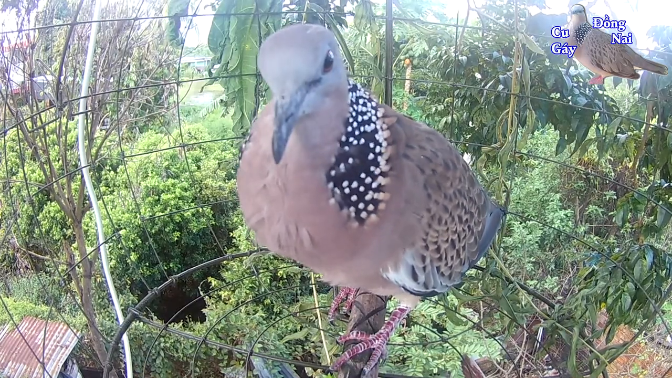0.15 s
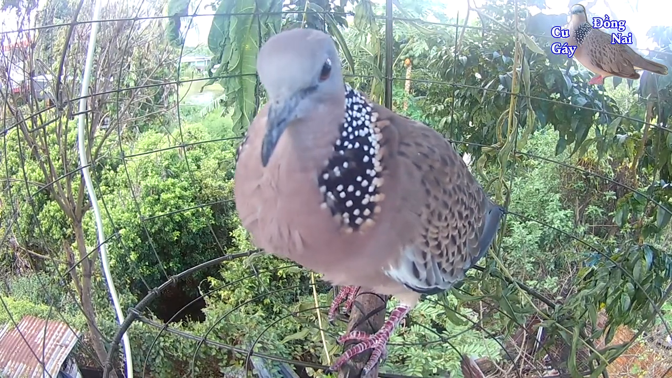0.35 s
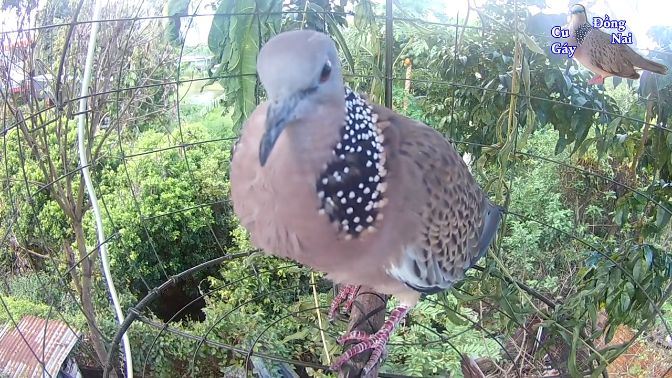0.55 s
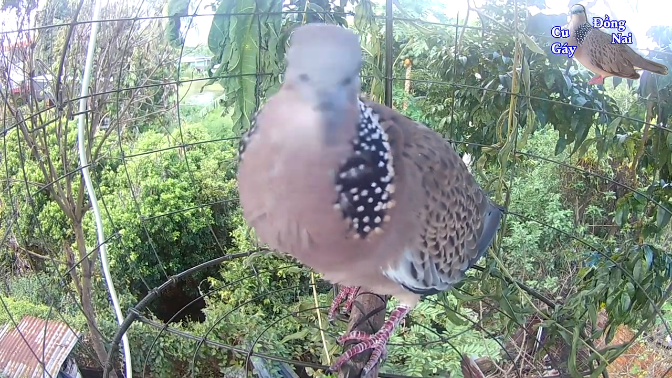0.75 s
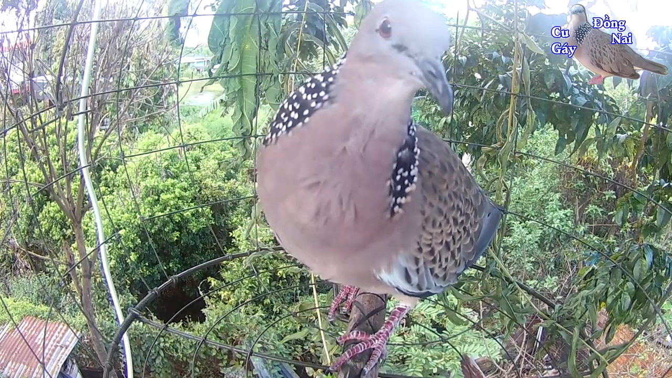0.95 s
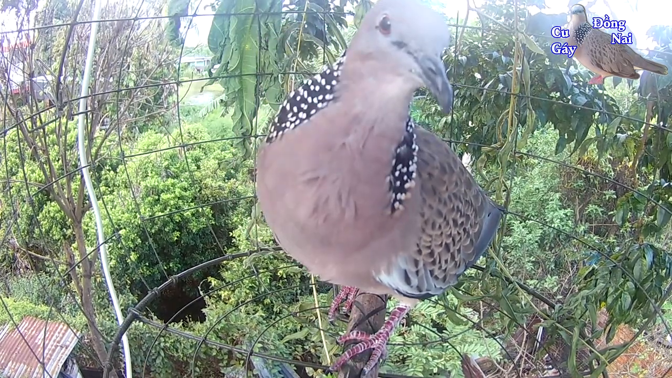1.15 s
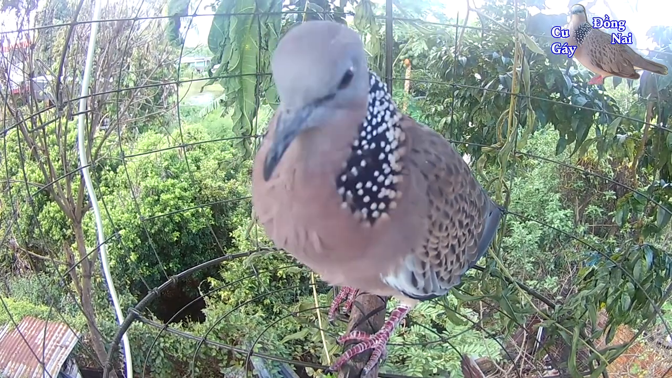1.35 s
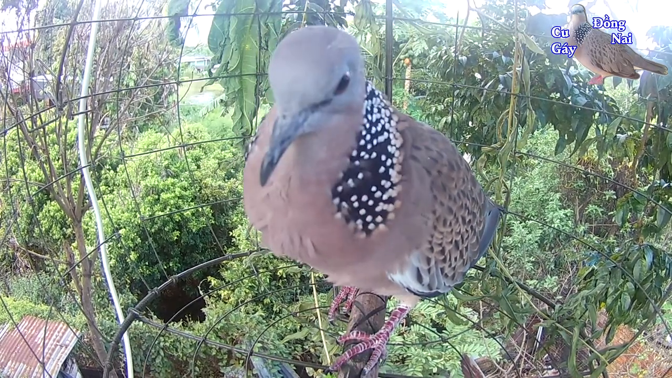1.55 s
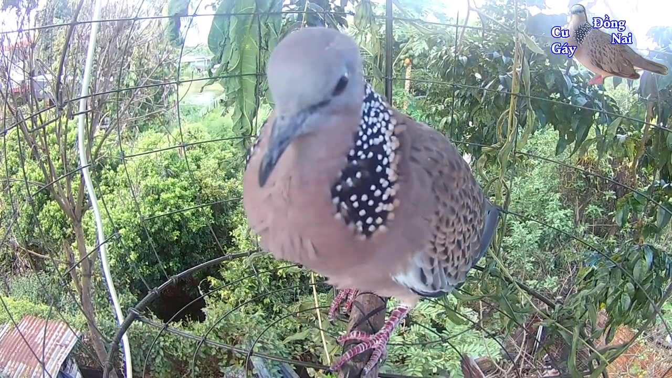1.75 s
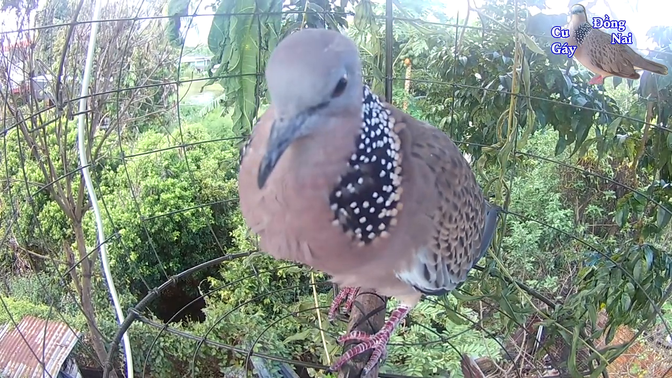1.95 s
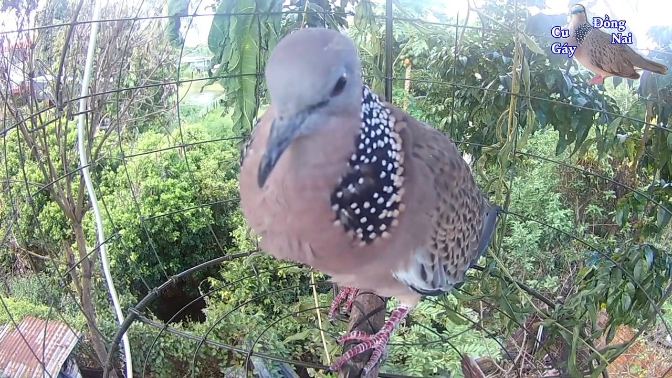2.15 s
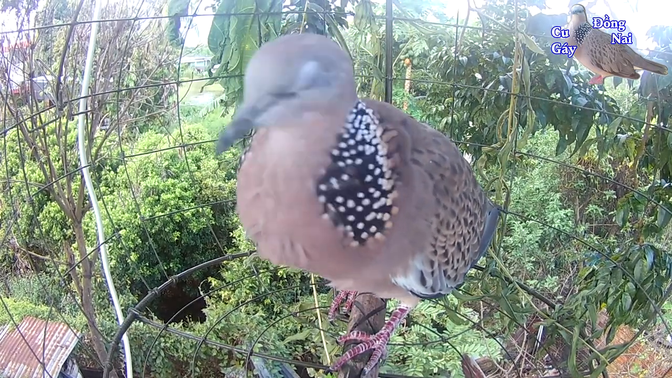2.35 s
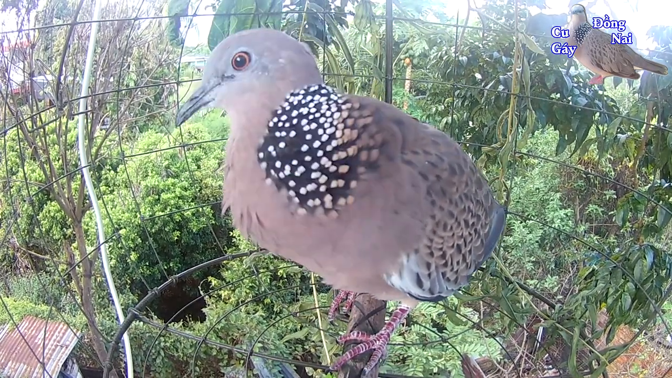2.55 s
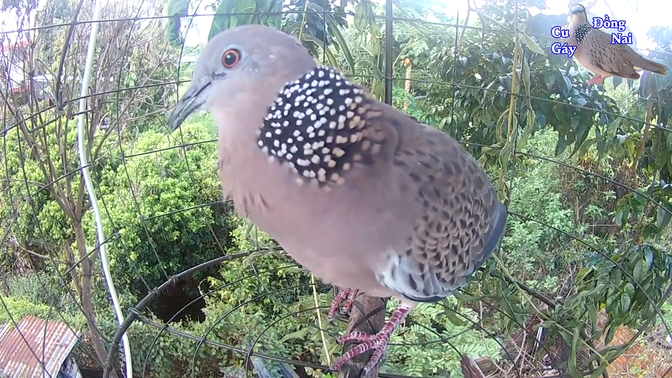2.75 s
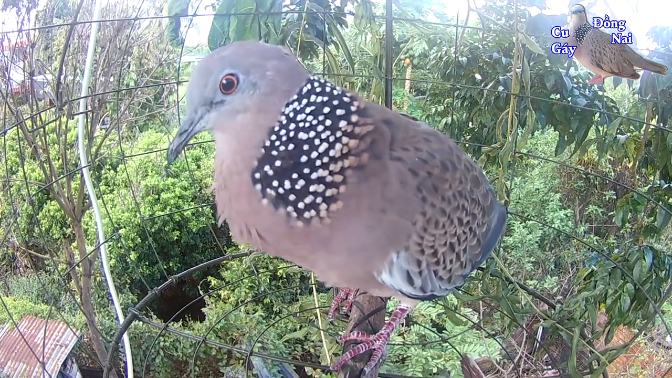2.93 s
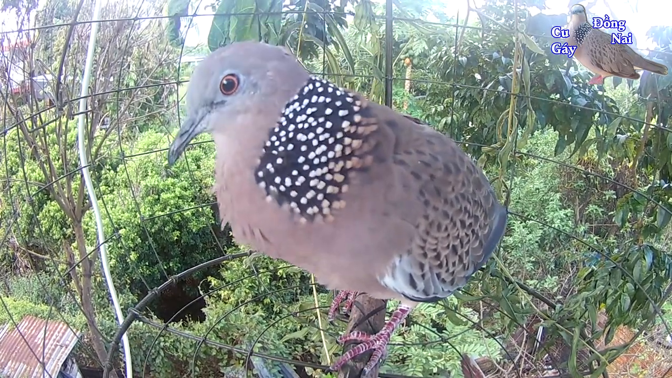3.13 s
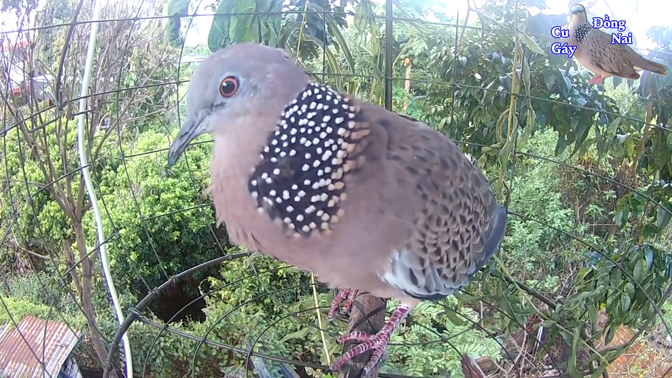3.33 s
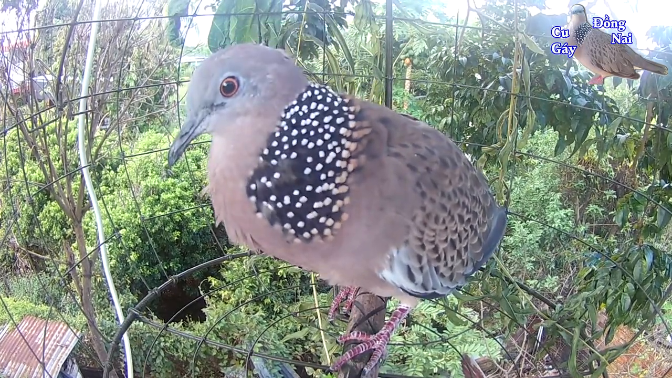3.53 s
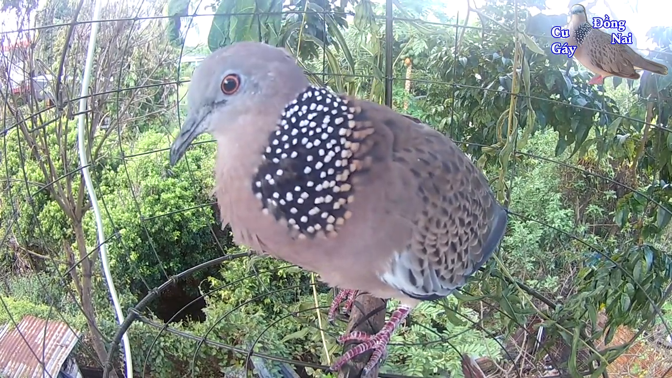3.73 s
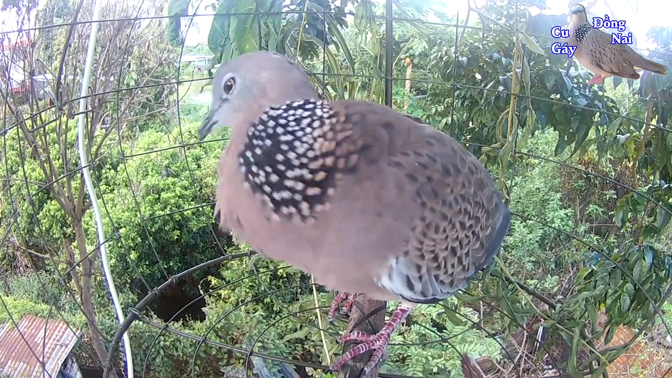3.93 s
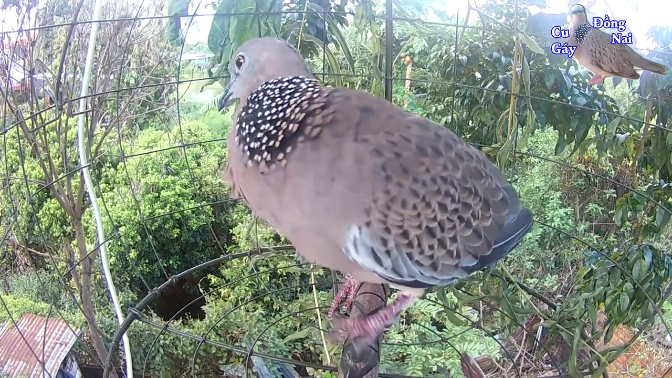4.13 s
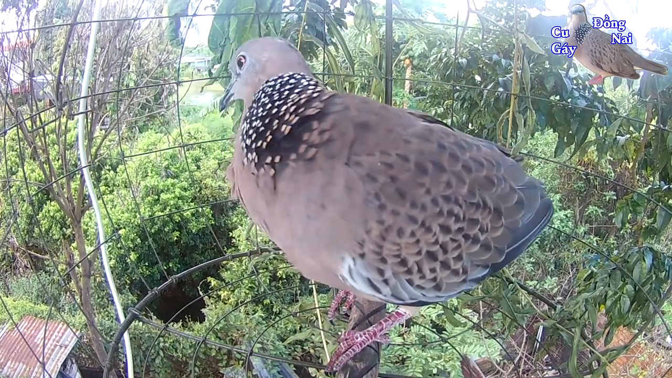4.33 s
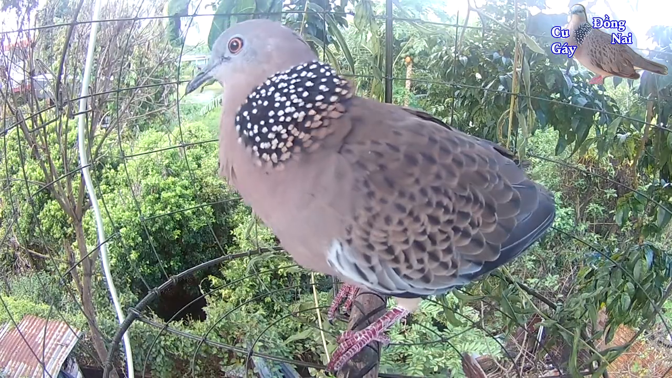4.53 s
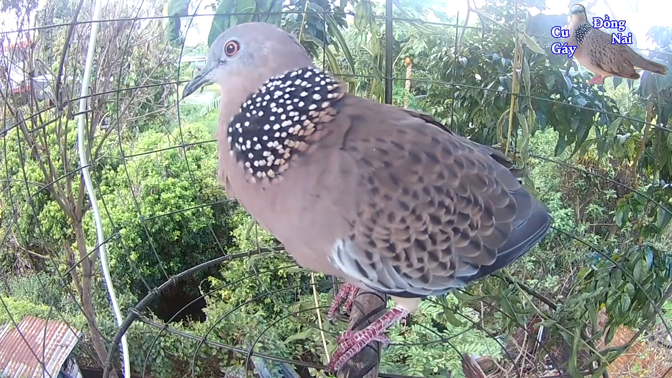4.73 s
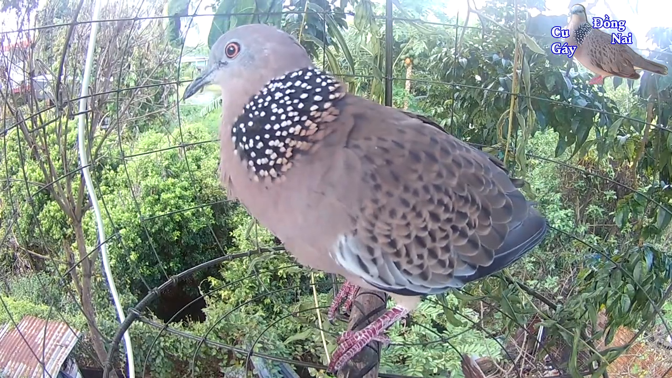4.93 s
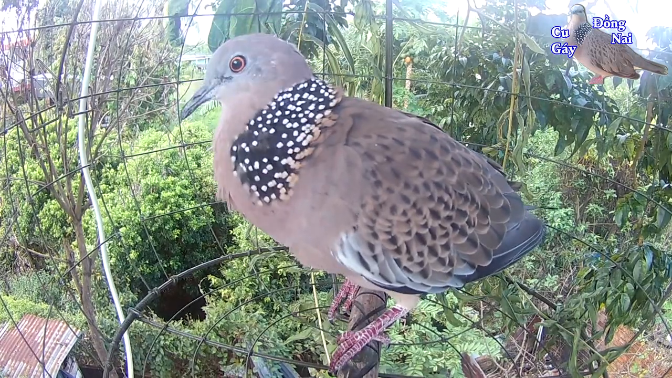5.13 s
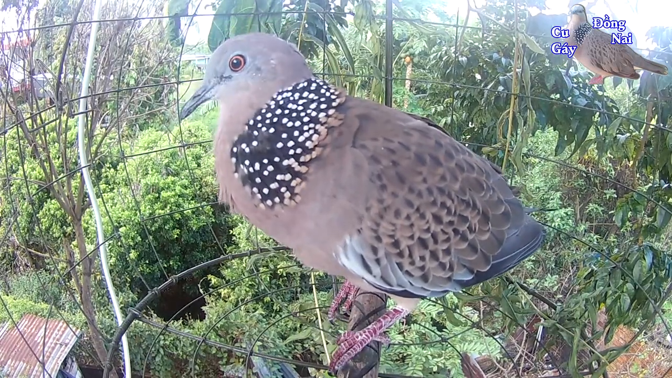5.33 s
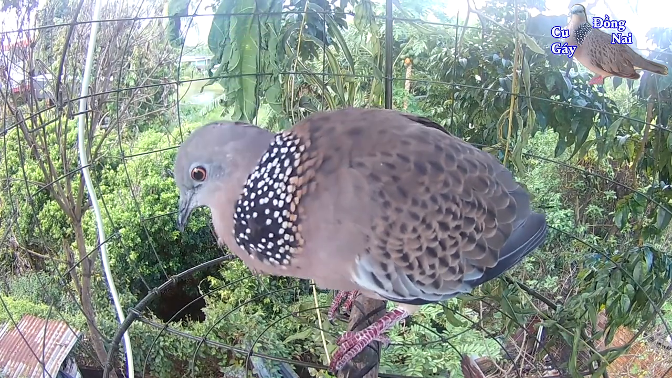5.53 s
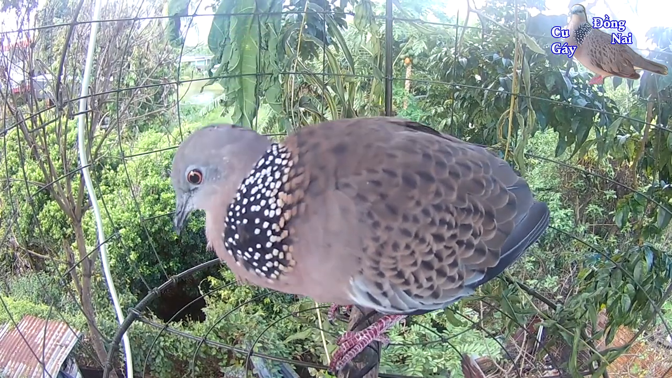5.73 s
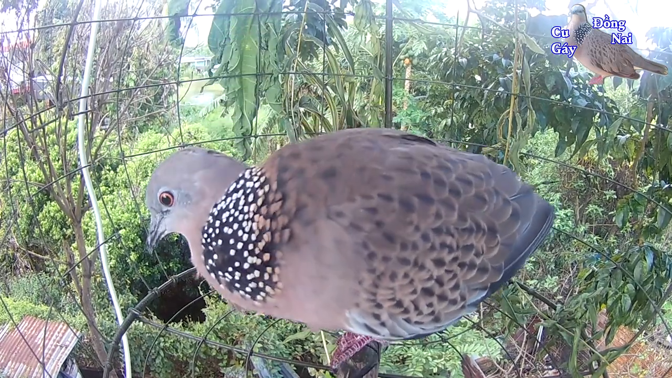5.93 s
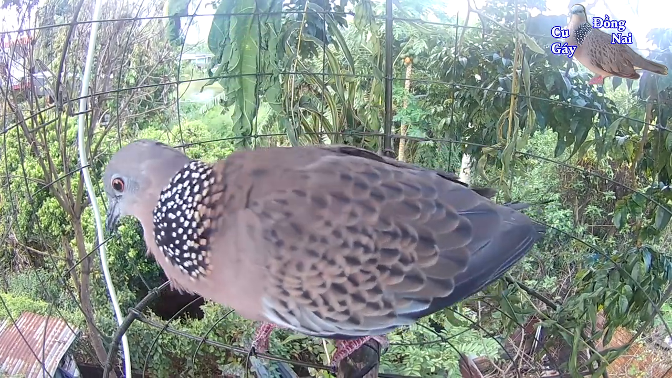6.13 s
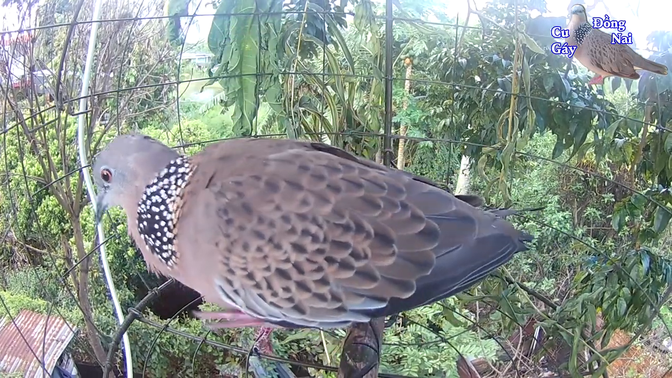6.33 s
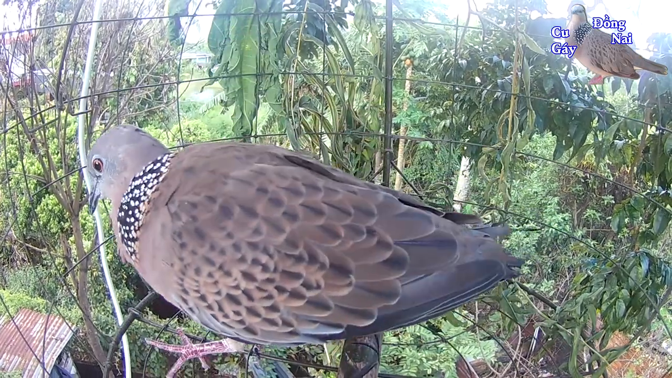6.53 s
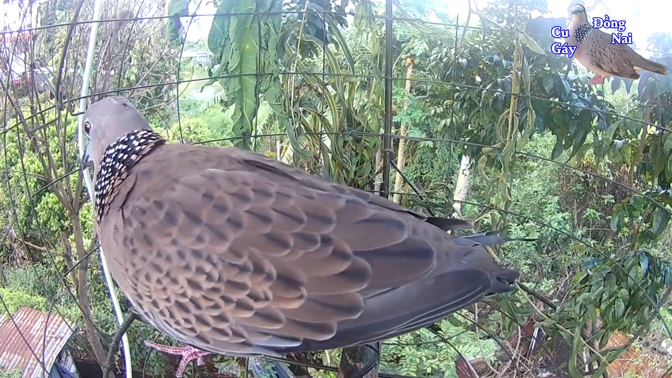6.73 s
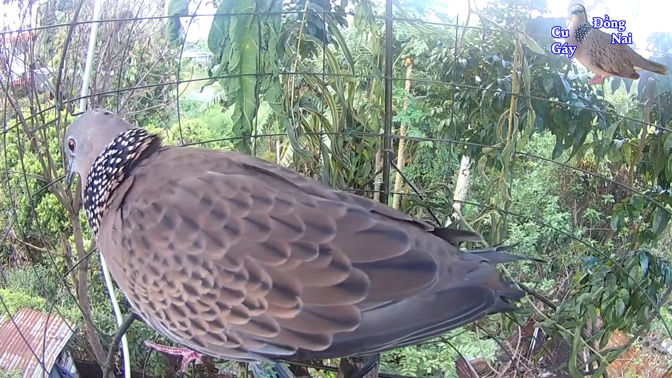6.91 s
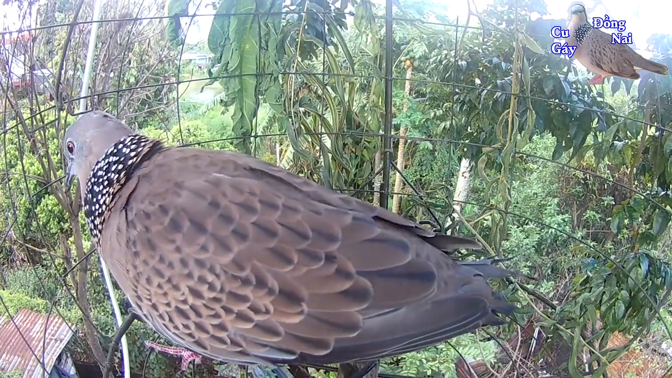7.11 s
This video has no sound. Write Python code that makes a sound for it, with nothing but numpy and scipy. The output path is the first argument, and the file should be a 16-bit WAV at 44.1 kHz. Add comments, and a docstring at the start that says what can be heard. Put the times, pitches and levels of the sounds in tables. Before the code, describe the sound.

A dove coos loudly up close in repeated trilled, falling phrases over a quiet garden hush, with faint distant birds.

```python
"""A spotted dove coos close by in a garden: two short notes, then a long falling one, over and over.
It sings with its beak shut, through a swollen crop (a throat pouch); a fluttering valve chops the
nearly pure tone into a trill. A distant rooster crows and other doves answer over a quiet hush.
The near bird shifts about, so its feet knock and scratch on the perch."""
import sys
import numpy as np
from scipy import signal
from scipy.fft import rfft, irfft
from scipy.io import wavfile

SR = 44100
rng = np.random.default_rng(int(sys.argv[2]) if len(sys.argv) > 2 else 0)


def unload_audio(sound):
    """Save the sound as a 16-bit wav file, at the path given as the first command line argument."""
    columns = np.transpose(np.atleast_2d(sound))
    # keep every value between -1 and 1, then stretch to whole-number steps
    steps = np.round(np.clip(columns, -1, 1) * 32767)
    wavfile.write(sys.argv[1], SR, steps.astype(np.int16))


N = 316197
TIME = np.arange(N) / SR
REST_HZ, EFFORT_DB_PER_OCTAVE = 411, 27   # short notes: pitch with no effort; louder as they get higher


def from_db(db):
    """Turn decibels into a factor to multiply by."""
    return 10 ** (np.asarray(db) / 20)


def unit_power(x):
    """Scale a sound to an average power of 1."""
    return x / np.sqrt(np.mean(x ** 2) + 1e-20)


def gain_at(points, hz):
    """Read the gain at hz from a curve with rows of f/Hz, level/dB."""
    f, db = np.transpose(points)
    return from_db(np.interp(np.log(hz + 1e-3), np.log(f), db))


def band(x, hz, kind, order=2):
    """Keep the lows, the highs or a band; a higher order cuts more steeply."""
    return signal.sosfilt(signal.butter(order, np.clip(hz, 10, .45 * SR), kind, fs=SR, output="sos"), x)


def drift(rate_hz, size=N):
    """A smooth random wobble of about 1 either way, mostly slower than rate_hz."""
    return unit_power(band(rng.standard_normal(size + SR // 2), rate_hz, "low")[SR // 2:])


def coloured_noise(spectrum):
    """Noise of power 1, shaped by rows of f/Hz, level/dB."""
    hz = np.arange(N // 2 + 1) * SR / N
    return unit_power(irfft(rfft(rng.standard_normal(N)) * gain_at(spectrum, hz), N))


def ramp(t, length):
    """Rise from 0 to 1 over length, then stay there."""
    return np.clip(t / length, 0, 1)


def clock(length):
    """Seconds since the start of a note."""
    return TIME[:int(length * SR)]


def placed(start, x):
    """Set a short sound at its time in the scene."""
    return np.interp(TIME, start + np.arange(len(x)) / SR, x, left=0, right=0)


def trill(turns, depth, gap=.62, chirp=.072, sag=.19, leak=.092, rounding=.11):
    """A valve nearly shuts once a turn: the tone chokes and sags, then climbs through the next pulse."""
    closure = np.round(turns - np.floor(turns.min())).astype(int)
    luck = rng.random((closure.max() + 1, 2))[closure]
    depth = np.clip(depth, 0, 1)
    # as the trill weakens, closures get shorter and some fail
    strength = np.clip(2.6 * depth - .6 - luck[:, 0], 0, 1)
    width = gap * (1 + depth) / 2
    shut = strength * np.exp(-np.abs(np.sin(np.pi * turns) / width) ** 4)
    gain = (1 - (1 - leak) * shut) / np.sqrt(1 - .4 * depth)
    gain *= 1 - rounding * depth * np.cos(2 * np.pi * turns)   # each pulse swells to its middle
    # each closure drags the pitch down by a different amount, which makes the purr rough
    bend = 1 - chirp * depth * np.sin(2 * np.pi * turns) - 2 * sag * luck[:, 1] * shut
    return gain, bend


def coo(pitch, level_db, depth, closure_s, trill_hz, speed_up=0, jitter=.014, breath_db=-44):
    """One dove note: a nearly pure tone chopped by the trill; its octave comes out as the pitch sinks."""
    # what the swollen crop lets out of the octave: f/Hz, level/dB against the main tone
    overtones = [(740, 4.5), (820, 4), (900, -4), (1000, -14.5), (1100, -21.5), (1200, -33.5),
                 (1290, -42.5), (1500, -38)]
    t = TIME[:len(pitch)]
    turns = np.cumsum(np.clip(trill_hz + speed_up * (t - closure_s), 40, 80)) / SR
    turns += .05 * drift(25, len(t)) - np.interp(closure_s, t, turns)   # a closure falls near closure_s
    gain, bend = trill(turns, depth)
    hz = pitch * bend * (1 + jitter * drift(150, len(t)))
    phase = 2 * np.pi * np.cumsum(hz) / SR
    octave = gain_at(overtones, 2 * hz)
    tone = np.sin(phase) + octave * np.sin(2 * phase) + from_db(-42.5) * np.sin(3 * phase)
    tone /= np.hypot(1, octave)
    breath = unit_power(band(rng.standard_normal(len(t)), [350, 1150], "band"))
    fade = ramp(np.minimum(t, t[-1] - t), .0013)
    return from_db(level_db) * fade * (np.sqrt(2) * gain * tone + from_db(breath_db) * breath)


def arched_note(start, length, top_hz, db, attack_s=.011, attack_db=14):
    """Pitch and loudness rise and fall together, then trail off in a low purr."""
    purr_s, purr_fade_db_per_s = .058, 197
    t = clock(length + purr_s)
    arch = np.abs(np.sin(np.pi * ramp(t, length))) ** .83
    pitch = REST_HZ + (top_hz - REST_HZ) * arch
    level_db = db + EFFORT_DB_PER_OCTAVE * np.log2(pitch / top_hz)
    level_db -= attack_db * (1 - ramp(t, attack_s))
    level_db -= purr_fade_db_per_s * np.maximum(t - length, 0)
    depth = ramp(t - .85 * length, .025)
    return placed(start, coo(pitch, level_db, depth, closure_s=length, trill_hz=64))


def rolled_note(start, climb_s, top_hz, db, clear_s):
    """A fast trill climbs, clears with a last push to the top and drops away."""
    start_hz, push_hz, push_s = 439, 45, .026
    attack_s, attack_db, drop_s, release_db = .042, 20, .033, 8.5
    t, closure_s = clock(climb_s + drop_s), climb_s - clear_s
    climbing = start_hz + (top_hz - push_hz - start_hz) * ramp(t, climb_s) ** .6
    climbing += push_hz * (1 - ramp(climb_s - t, push_s) ** 2)
    drop = ramp(t - climb_s, drop_s)
    pitch = REST_HZ + (climbing - REST_HZ) * np.cos(np.pi / 2 * drop) ** 1.6
    level_db = db + EFFORT_DB_PER_OCTAVE * np.log2(pitch / top_hz)
    level_db -= attack_db * (1 - ramp(t, attack_s)) + release_db * drop ** 3
    depth = .79 * (1 - ramp(t - closure_s, .02) ** 2)
    return placed(start, coo(pitch, level_db, depth, closure_s, trill_hz=80))


def falling_note(start, length, top_hz, db, surge_db):
    """The voice catches on one low, soft pulse, leaps up, sinks in a long fading trill and drops."""
    start_hz, sunk_hz, end_hz = 554, 495.9, 332.4
    attack_s, catch_s, top_at_s, drop_s = .016, .028, .046, .038
    attack_db, catch_db, fade_db, release_db = 23.5, 11.5, 15, 32.5
    t = clock(length)
    leap = np.sin(np.pi / 2 * ramp(t - catch_s, top_at_s - catch_s))
    sink = ramp(t - top_at_s, length - top_at_s - drop_s)
    drop = ramp(t - length + drop_s, drop_s)
    waver = drift(65, len(t))   # the effort is never quite steady
    surge = np.exp(-((t - .058) / .008) ** 2)   # an extra push on one pulse at the top
    pitch = start_hz + (top_hz - start_hz) * leap
    pitch -= (top_hz - sunk_hz) * sink ** 1.1 + (sunk_hz - end_hz) * drop ** .89
    pitch *= 1 + .02 * waver
    level_db = db - attack_db * (1 - ramp(t, attack_s)) - catch_db * (1 - leap) ** 2
    level_db -= fade_db * sink ** 1.906 + release_db * drop ** 3
    level_db += .2863 * waver + surge_db * surge
    depth = .79 * (1 - sink ** 3.1) + .74 * drop   # the trill thins out, then creaks in the drop
    return placed(start, coo(pitch, level_db, depth, closure_s=catch_s, trill_hz=50, speed_up=85))


def near_dove(crop_db=-2):
    """The crop rings near 1.1 kHz and passes little above; the small body gives out nothing deep."""
    # the pure note that opens a call: t/s, length/s, top pitch/Hz, level/dB
    arches = [(-.125, .085, 610, -8), (1.325, 0.0833, 606, -10), (2.822, 0.08, 604, -11),
              (4.551, 0.075, 586, -14), (6.875, 0.077, 622, -14)]
    # the rolled second note: t/s, climb/s, top pitch/Hz, level/dB, clear end of the climb/s
    rolls = [(.012, .13, 669, -6.5, 0.026), (1.47, 0.11, 690, -5, 0.038), (2.97, 0.12, 695.2, -6.5, 0.035),
             (4.698, 0.11, 642.3, -11.5, .02), (7.035, .111, 746, -6.5, 0.038)]
    # the long last note: t/s, length/s, top pitch/Hz, level/dB, surge/dB
    falls = [(0.282, 0.4125, 719.7, -5.5, 0.85), (1.71, 0.4286, 736, -5.5, 2.5),
             (3.213, 0.426, 724, -6.5, 0), (4.937, .418, 728, -8.5, -0.5)]
    voice = sum(arched_note(*row) for row in arches)
    voice += sum(rolled_note(*row) for row in rolls)
    voice += sum(falling_note(*row) for row in falls)
    voice += from_db(crop_db) * band(voice, [1020, 1220], "band")
    return band(band(voice, 400, "high", order=6), 1260, "low", order=6)


def rooster(jitter=.0064, rasp_jitter=.031, hoarse_db=-5, throb_db=2, attack_s=.04, release_s=.018):
    """A throbbing crow; rasp adds tones between the overtones, a shaky pitch and hoarse noise."""
    # the rooster's throat as heard from afar: f/Hz, level/dB
    throat = [(350, -40), (720, 2), (1000, -12), (1400, 4), (1700, -11.5), (1900, -17), (2150, -31.5),
              (2850, -40), (3050, -37.5), (3500, -52.5)]
    # syllables of the crows: t/s, length/s, first pitch/Hz, last pitch/Hz, level/dB, rasp/0-1
    syllables = [(-.03, 0.34, 684.2, 664.4, -45.5, 0.2), (0.211, 0.15, 776, 741, -41, 0.59),
                 (0.328, 0.33, 731, 726, -48, 0.37), (0.959, 0.15, 686.7, 639.5, -50.5, 0.25),
                 (6.589, 0.081, 714, 766.9, -38, 0.25), (6.653, .12, 729, 702, -36, 0.26),
                 (6.861, .125, 828, 843.5, -29.5, 0.1), (6.94, 0.116, 771, 771, -43.5, 0.99),
                 (7.03, 0.14, 777, 780, -34.5, .9)]
    out, noise = np.zeros(N), coloured_noise(throat)
    for start, length, first_hz, last_hz, db, rasp in syllables:
        t = clock(length)
        scoop = 1 - .09 * np.exp(-t / .015)   # each syllable slides up from below its first pitch
        pitch = (first_hz + (last_hz - first_hz) * t / length) * scoop
        shake = (jitter + rasp_jitter * rasp ** 2) * drift(120, len(t))
        phase = 2 * np.pi * np.cumsum(pitch * (1 + shake)) / SR
        voice = sum(gain_at(throat, pitch * multiple) * weight * np.sin(phase * multiple)
                    for multiple, weight in [(1, 1), (1.5, rasp), (2, 1), (2.5, rasp), (4, 1)])
        envelope = from_db(db) * ramp(t, attack_s) * ramp(length - t, release_s)
        hoarse = from_db(hoarse_db) * np.sqrt(rasp) * placed(start, envelope) * noise
        out += placed(start, envelope * voice) + hoarse
    return from_db(throb_db * drift(45)) * out


def air(hush_db=-58.5, drone_hz=105, drone_db=-65):
    """A quiet outdoor hush with a low, wavering drone."""
    # the tone colour of garden air: f/Hz, relative level/dB
    hush_colour = [(25, -7.5), (122, -12.5), (250, -12.5), (500, -16.5), (800, -16.5), (1340, -16.5),
                   (2770, -36), (4500, -37), (7100, -48), (15500, -51.5)]
    drone = unit_power(band(rng.standard_normal(N), [drone_hz * .87, drone_hz * 1.15], "band"))
    return from_db(hush_db) * coloured_noise(hush_colour) + from_db(drone_db) * drone


def far_doves(attack_s=.0322, release_s=.047):
    """Trilled calls that sink and grow clearer at the end; their overtones are lost on the way."""
    # distant calls: t/s, length/s, first pitch/Hz, last pitch/Hz, level/dB, trill depth/0-1,
    # swell as the trill clears/dB
    calls = [(0.687, 0.48, 804, 653.5, -47.5, 0.99, 7), (2.192, 0.4, 686, 624.7, -43, 0.6, -2),
             (3.619, 0.14, 754.2, 703, -44.5, 0.74, -1.5), (3.871, .43, 744, 681.4, -48, 0.99, 8),
             (5.518, .2, 796.4, 766, -60, 0.43, 7.5), (5.729, 0.078, 708, 669, -51.5, 0.8, -5.5),
             (5.913, 0.13, 728, 658, -48.5, 0.39, 0), (6.123, .33, 742, 669.5, -49.5, .95, -5.5)]
    voices = np.zeros(N)
    for start, length, first_hz, last_hz, db, depth, swell_db in calls:
        t = clock(length)
        clear = ramp(t / length - .64, .16)
        pitch = first_hz + (last_hz - first_hz) * (t / length) ** 1.3
        note = coo(pitch, db + swell_db * clear, depth * (1 - .61 * clear),
                   closure_s=0, trill_hz=50, jitter=.0031, breath_db=-14)
        voices += placed(start, note * ramp(t, attack_s) * ramp(length - t, release_s) ** 2)
    return band(voices, [540, 900], "band", order=3)


def perch_knocks(push_s=.0022, rattle_db=-10, rattle_s=.056):
    """Each footfall is a soft push that sets the light perch ringing and rattling."""
    # feet landing: t/s, peak level/dB, treble cut-off of the contact/Hz
    footfalls = [(4.24, -6.5, 1270), (4.26, -20.5, 1922), (4.278, -23.5, 1944), (6.057, -14, 610),
                 (6.079, -21.5, 472), (6.504, -31, 700), (6.517, -25, 665), (6.755, -31.5, 1196)]
    # tones the perch rings at: f/Hz, level/dB, time to fade by 60 dB/s
    perch_tones = [(358, -20, 0.176), (576.7, -12.5, 0.24), (632, 6, 0.05), (793.6, 6.5, 0.024),
                   (900.7, -10.5, 0.072), (1241, -24, 0.12), (1564, -36, 0.12)]
    out, t = np.zeros(N), TIME[:SR // 4]
    ring = sum(from_db(db - 60 * t / fade_s) * np.sin(2 * np.pi * hz * t)
               for hz, db, fade_s in perch_tones)
    push = 1 - np.exp(-(t / push_s) ** 2)
    for start, peak_db, contact_hz in footfalls:
        rattle = from_db(rattle_db - 60 * t / rattle_s) * rng.standard_normal(len(t))
        knock = band((ring + rattle) * push, contact_hz, "low", order=3)
        knock = band(knock, 400, "high", order=4)
        out[int(start * SR):][:len(t)] += from_db(peak_db) * knock / np.abs(knock).max()
    return out


def scratches(rise_s=.006, grain_db=3):
    """Claws scrape in short, grainy bursts, coloured by the wire and wood under them."""
    # scrapes of claws and feathers: t/s, level/dB, decay time/s
    scrapes = [(4.24, -62, .006), (4.272, -47.5, 0.018), (5.75, -64.5, 0.0106), (5.96, -51, 0.013),
               (6.034, -54.5, 0.0214), (6.054, -27, 0.00554), (6.353, -50, 0.013), (6.508, -67, 0.0153)]
    # where the wire and wood ring: f/Hz, width/Hz, level/dB
    resonances = [(1740, 80, 6), (2178, 110, 2), (2740, 155, 1), (3925, 400, -6.5), (4604, 110, 3),
                  (4900, 230, -61)]
    envelope = np.zeros(N)
    for start, db, decay_s in scrapes:
        t = TIME - start
        envelope += from_db(db) * ramp(t, rise_s) * np.exp(-np.maximum(t - rise_s, 0) / decay_s)
    grains = from_db(grain_db * drift(370)) * rng.standard_normal(N)
    ringing = sum(from_db(db) * band(grains, [hz - width / 2, hz + width / 2], "band", order=1)
                  for hz, width, db in resonances)
    return envelope * unit_power(band(ringing, [1200, 5700], "band", order=6))


def garden(x, echo_db, fade_s):
    """Add scattered echoes from walls and leaves; they die away by 60 dB in fade_s."""
    t = TIME[:SR]
    echoes = rng.standard_normal(SR) * from_db(-60 * t / fade_s) * (t > .006)
    return x + from_db(echo_db) * signal.fftconvolve(x, echoes / np.linalg.norm(echoes))[:N]


def scene():
    """The near dove's voice has almost no echo; the far birds have plenty."""
    near = garden(near_dove(), echo_db=-31, fade_s=.25)
    feet = garden(perch_knocks() + scratches(), echo_db=-12, fade_s=.13)
    answers = garden(far_doves(), echo_db=-4, fade_s=.25)
    crowing = garden(rooster(), echo_db=-2.5, fade_s=.17)
    return (near + feet + answers + crowing + air())[None]


def record(dry):
    """The loudest pulses overload and are flattened; the highest treble is cut."""
    treble_cut = signal.cheby2(12, 70, 16700, fs=SR, output="sos")
    return signal.sosfilt(treble_cut, np.clip(dry, -1, 1))


dry = scene()
out = record(dry)
unload_audio(out)
```